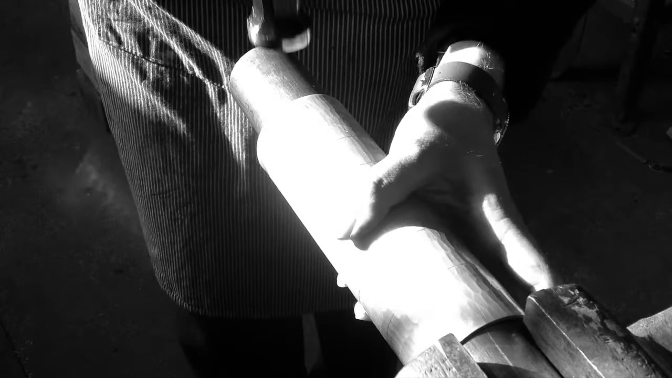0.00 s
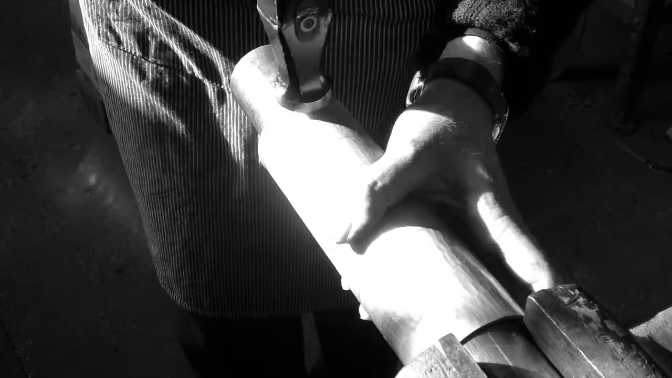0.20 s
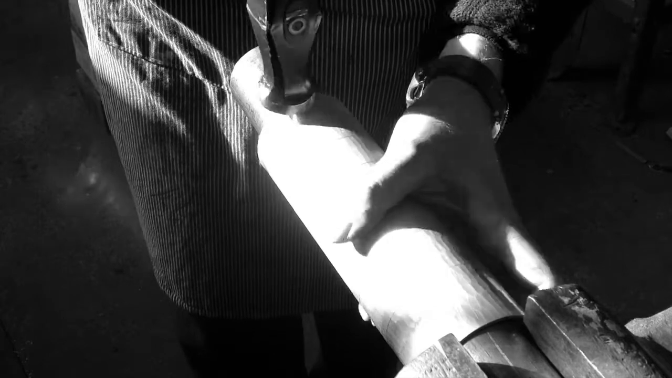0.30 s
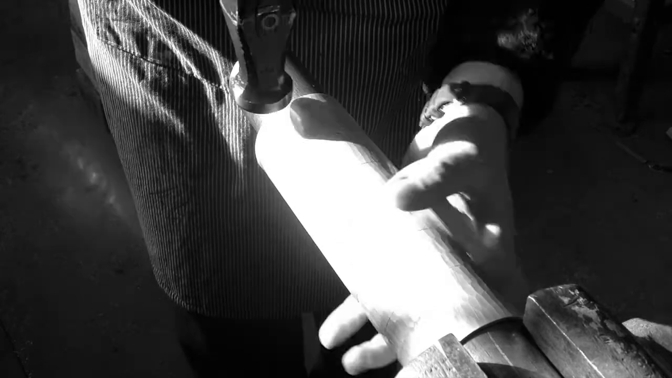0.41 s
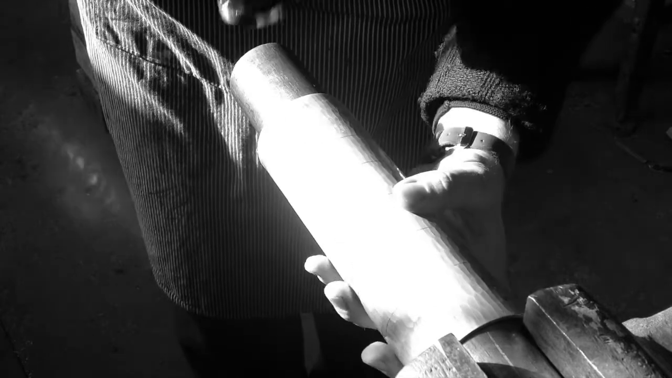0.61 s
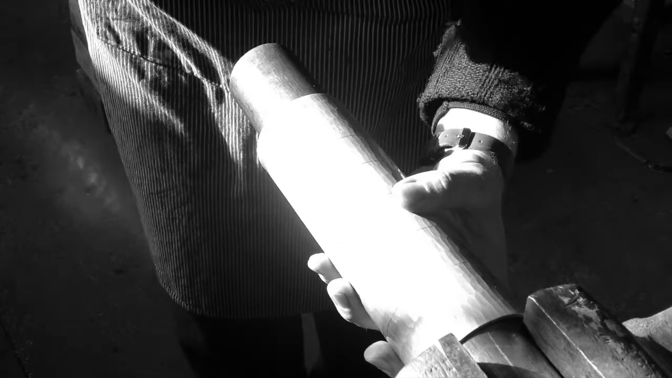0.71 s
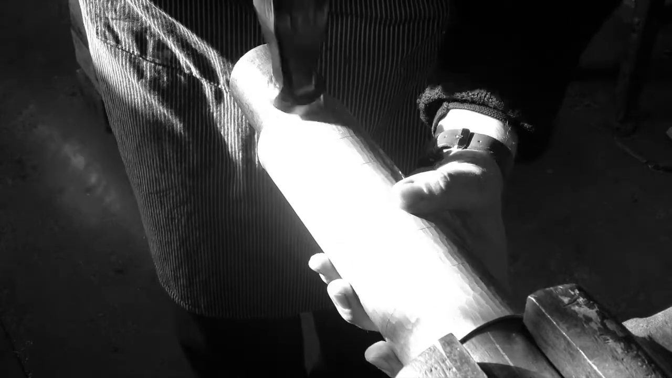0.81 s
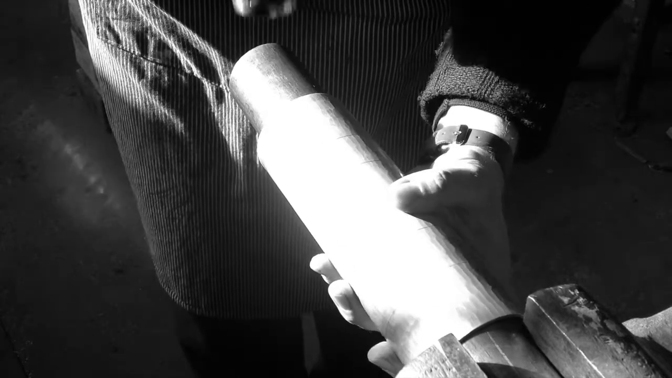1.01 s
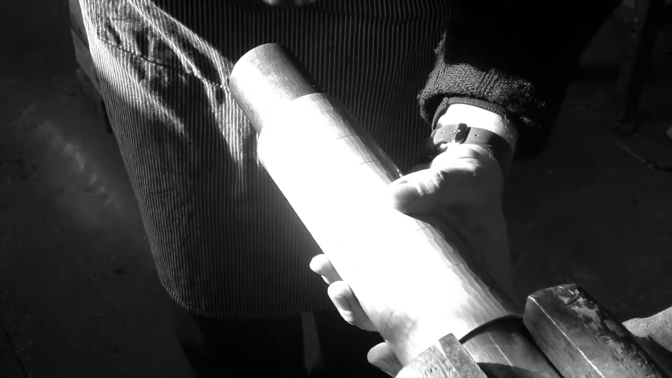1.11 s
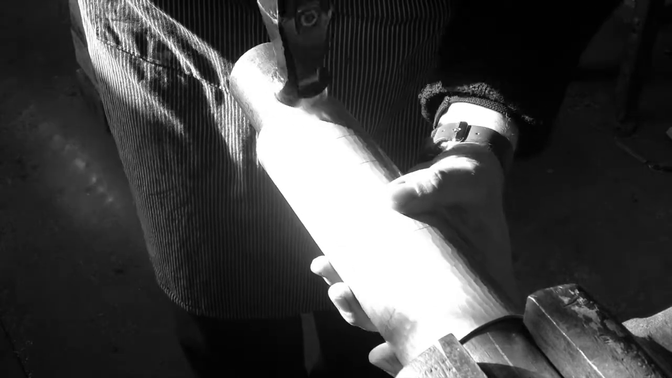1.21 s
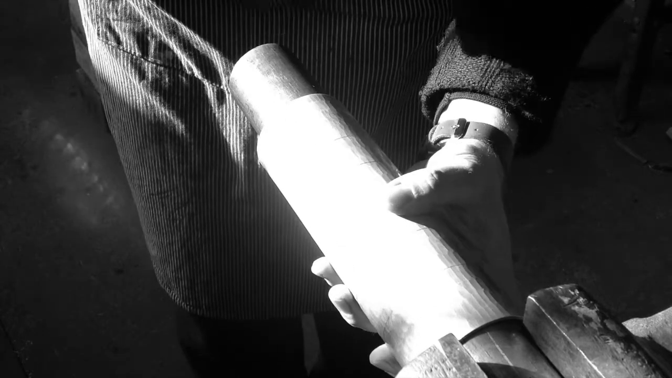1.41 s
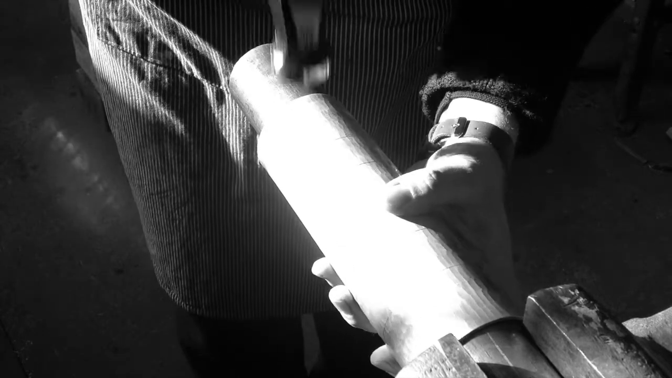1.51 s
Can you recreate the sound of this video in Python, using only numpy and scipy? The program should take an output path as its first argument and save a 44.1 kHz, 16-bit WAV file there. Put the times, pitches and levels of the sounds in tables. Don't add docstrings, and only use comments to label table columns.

```python
import sys
import numpy as np
from scipy import signal
from scipy.fft import rfft, irfft
from scipy.io import wavfile
from scipy.ndimage import uniform_filter1d

SR = 44100
rng = np.random.default_rng(int(sys.argv[2]) if len(sys.argv) > 2 else 0)


def materialize(psi):
    bounded = np.clip(np.atleast_2d(psi).T, -1, 1)
    quanta = np.round(bounded * 32767).astype(np.int16)
    wavfile.write(sys.argv[1], SR, quanta)


def linear_from_db(decibels):
    return 10 ** (np.asarray(decibels, float) / 20)


N = 68355
LEAD = SR // 4


def read(table, hz, order=1):
    rows = np.array(table, float)
    return np.interp(np.log(hz), np.log(rows[:, 0]), rows[:, order])


def add(track, s, x):
    i = LEAD + int(s * SR)
    track[i:i + len(x)] += x[:len(track) - i]


def ring(hz, db, t60_s, rise_s, size, spread_rad=0.98):
    t = np.arange(size) / SR
    hz, db, t60_s = (np.asarray(v)[:, None] for v in (hz, db, t60_s))
    phase = spread_rad * rng.uniform(-1, 1, hz.shape)
    modes = linear_from_db(db - 60 * t / t60_s) * np.sin(2 * np.pi * hz * t + phase)
    return modes * (1 - np.exp(-t / rise_s))


VASE_HZ = [1352, 2000, 2345, 2600, 3810, 4010, 4400, 4630, 4980, 5160, 5525, 6150, 7585, 10060]
# [level/dB, t60/s]
VASE_MODES = [(-10.5, .08), (-14.5, 0.066), (-8.5, 0.061), (-6, 0.017), (-15, .06), (-4.5, 0.045),
              (-10.5, .07), (-22.5, .06), (2.5, 0.044), (-27, .08), (-12.5, 0.087), (-4, 0.035),
              (-11, 0.18), (-12.5, .07)]
# [f/Hz, level/dB]
SHELL_LEVEL = [(180, -44), (300, -13.5), (1730, -12.5), (2320, -5.5), (3180, -10), (5050, -2.5), (5850, -7),
               (10300, -7.5), (15500, -8)]
# [f/Hz, t60/s]
SHELL_T60 = [(300, 0.18), (2000, 0.048), (6000, 0.08), (15000, .04)]
SHELL_DB, SCATTER_DB, CONTACT_S = -13.5, 2.2, 0.00091


def vase(db):
    hz = np.array(VASE_HZ)
    mode_db, t60_s = np.array(VASE_MODES).T
    detune, scatter = rng.standard_normal((2, len(hz)))
    strong_db = db + mode_db + SCATTER_DB * scatter / 2
    strong = ring(hz * (1 + detune / 800), strong_db, t60_s, CONTACT_S, size=SR // 4)

    place, level, length = rng.random((3, 260))
    hz = 200 + 15300 * place ** 1.3
    small_db = db + SHELL_DB + read(SHELL_LEVEL, hz) + 8 * (level - .5)
    small_t60_s = read(SHELL_T60, hz) * (.5 + length)
    small = ring(hz, small_db, small_t60_s, CONTACT_S, size=SR // 5)
    return strong.sum(axis=0), small.sum(axis=0)


STUMP_HZ = [205, 260, 310, 395, 520, 610, 695, 750, 800, 870, 1080]
# [level/dB, t60/s]
STUMP_MODES = [(-22.5, 0.14), (-26.5, 0.072), (-24.5, 0.098), (-22.5, 0.09), (-23, 0.11), (-17.5, .06),
               (-13, 0.08), (-16.5, 0.094), (-21.5, .09), (-26.5, 0.11), (-24, 0.072)]
THUD_RISE_S = 0.0058


def stump(db):
    mode_db, t60_s = np.array(STUMP_MODES).T
    mode_db = mode_db + rng.standard_normal(len(t60_s))
    return ring(STUMP_HZ, db + mode_db, t60_s, THUD_RISE_S, size=SR // 3, spread_rad=.3).sum(axis=0)


THUMP_HZ, THUMP_S = 162, .004


def thump(db):
    t = np.arange(SR // 10) / SR
    push = t / THUMP_S * np.exp(1 - t / THUMP_S)
    return linear_from_db(db) * push * np.sin(2 * np.pi * THUMP_HZ * t)


SWING_DB, SWING_PER_S = 4.5, 3.7


def walk(rate_hz, count, size):
    k = int(SR / rate_hz)
    steps = np.repeat(rng.standard_normal((count, size // 1000 + 2)), k, axis=1)[:, :size]
    return 1.3 * uniform_filter1d(uniform_filter1d(steps, k), k)


STEEL_HZ = [2324, 4000, 6197, 7562, 9540, 10980, 11650, 13740, 6907, 8555]
# [t60/s, twin offset/Hz, twin level/dB, swell at the onset/s]
STEEL_MODES = [(0.46, 14, -8, .01), (0.55, 7.7, -8, 0.0057), (0.48, 6.6, 1, .02), (0.54, 3.3, -9.5, .003),
               (0.45, 2.7, -2, .003), (0.7, 1.9, -12, .02), (0.63, 1.9, -15, .06), (.2, 8, -9.5, .003),
               (.3, 9.5, -12, .003), (0.24, 9.3, -9.5, 0.0025)]
# [level/dB, level/dB, level/dB, level/dB]
STEEL_DB = [(-15.5, -28, -25, -30), (-19.5, -23.5, -19, -20.5), (-14, -26.5, -18.5, -17),
            (-22, -23.5, -20, -28), (-42.5, -42, -33.5, -30.5), (-50.5, -38, -54.5, -49.5),
            (-30.5, -23, -19, -27), (-45.5, -45.5, -49.5, -47.5), (-38, -40, -32.5, -32),
            (-41.5, -43.5, -36, -37.5)]


def steel(blow, db, longer):
    hz, size = np.array(STEEL_HZ), SR * 4 // 5
    t60_s, twin_hz, twin_db, swell_s = np.array(STEEL_MODES).T
    t60_s, swell_s = t60_s * longer, swell_s[:, None]
    db = db + np.array(STEEL_DB)[:, blow]
    lower = ring(hz - twin_hz / 4, db, t60_s, swell_s, size, spread_rad=.3)
    upper = ring(hz + twin_hz * .75, db + np.minimum(twin_db, 0), t60_s, swell_s, size, spread_rad=.3)
    swing = linear_from_db(SWING_DB * walk(SWING_PER_S, count=len(hz), size=size))
    return ((lower + upper) * swing).sum(axis=0)


# [f/Hz, t60/s, level/dB]
ROOM = [(100, 0.24, -11), (250, 0.85, -3), (600, 0.54, -5), (1540, 0.58, -1), (3000, 0.46, -2.5),
        (5560, 0.45, -8), (9500, 0.3, -1.5), (14900, .33, -14)]
ROOM_RISE_S = 0.0043


def room():
    t, f = np.arange(SR) / SR, np.fft.rfftfreq(SR, 1 / SR)
    noise = rfft(rng.standard_normal(SR))
    out = np.zeros(SR)
    for hz in 50 * 2 ** (np.arange(26) / 3):
        window = np.clip(1 - 3 * np.abs(np.log2((f + 1) / hz)), 0, 1)
        band = irfft(noise * window, SR)
        out += band * linear_from_db(read(ROOM, hz, order=2) - 60 * t / read(ROOM, hz))
    return out * (1 - np.exp(-(t / ROOM_RISE_S) ** 2)) / 40


# [f/Hz, level/dB]
HISS = [(40, -26), (130, -10.5), (320, -8), (1080, -11), (3000, -22), (6500, -30), (11000, -30.5),
        (15500, -37.5)]
HISS_DB = -68


def hiss():
    f = np.fft.rfftfreq(N, 1 / SR) + 1
    x = irfft(rfft(rng.standard_normal(N)) * linear_from_db(read(HISS, f)) * (f > 30), N)
    return x * linear_from_db(HISS_DB) / np.std(x)


# [t/s, level/dB, thud level/dB, thump level/dB, ring length factor]
BLOWS = [
    (-.11, -15, 4, -22, 0.76),
    (0.2269, -14, 4, -15.5, 1),
    (.8444, -16, 6, -24, 0.76),
    (1.2083, -15, 3.5, -21.5, 0.79),
]
VASE_WET_DB, STEEL_WET_DB = -5, -1.5


def scene():
    clank, tones, rings = np.zeros((3, N + LEAD))
    for blow, (s, db, thud_db, thump_db, longer) in enumerate(BLOWS):
        strong, small = vase(db)
        add(tones, s, strong)
        add(clank, s, small)
        add(clank, s, stump(db + thud_db))
        add(clank, s, thump(db + thump_db))
        add(rings, s, steel(blow, db, longer))
    direct = clank + tones + rings
    into_room = clank + linear_from_db(VASE_WET_DB) * tones + linear_from_db(STEEL_WET_DB) * rings
    wet = signal.fftconvolve(into_room, room())[:len(clank)]
    return ((direct + wet)[LEAD:] + hiss())[None]


def roll_off(x):
    return signal.sosfilt(signal.butter(12, 16580, fs=SR, output="sos"), x)


MIC_LOW_HZ, MIC_TOP_HZ = 110, 15300


def record(dry):
    x = signal.sosfilt(signal.butter(3, MIC_LOW_HZ, "high", fs=SR, output="sos"), dry)
    x = signal.sosfilt(signal.butter(10, MIC_TOP_HZ, fs=SR, output="sos"), x)
    return roll_off(x)


dry = scene()
out = record(dry)
materialize(out)
```